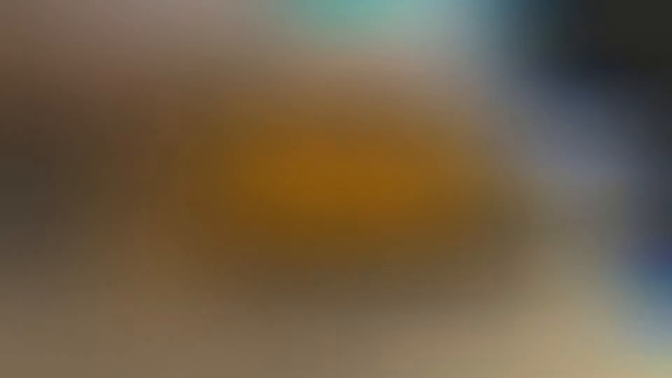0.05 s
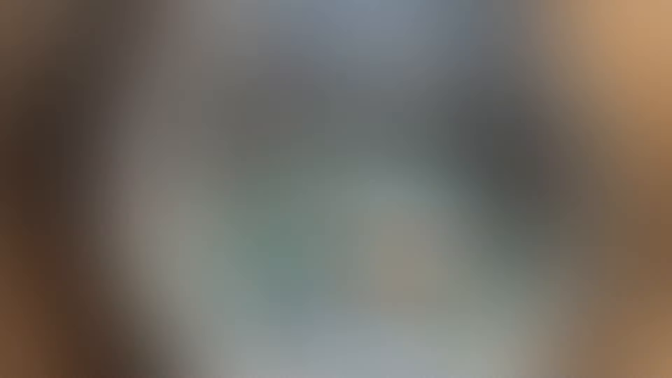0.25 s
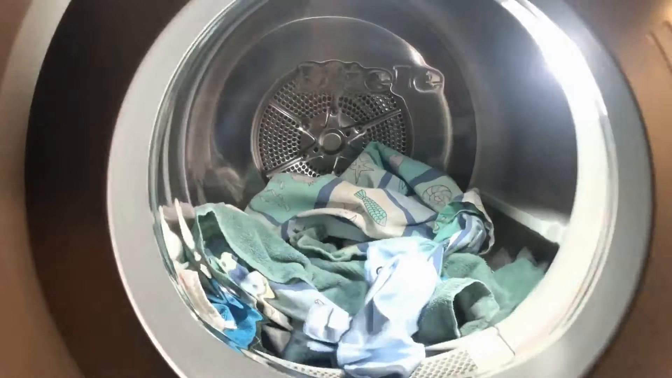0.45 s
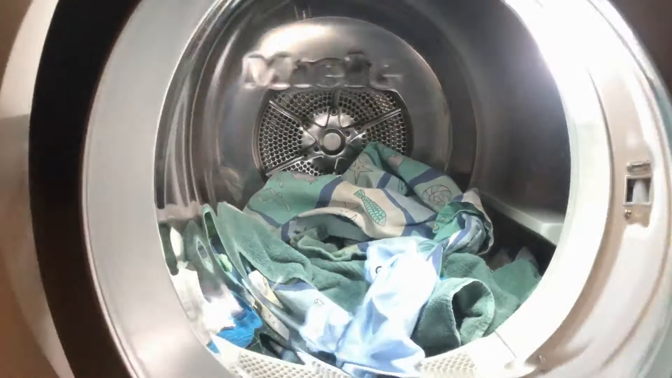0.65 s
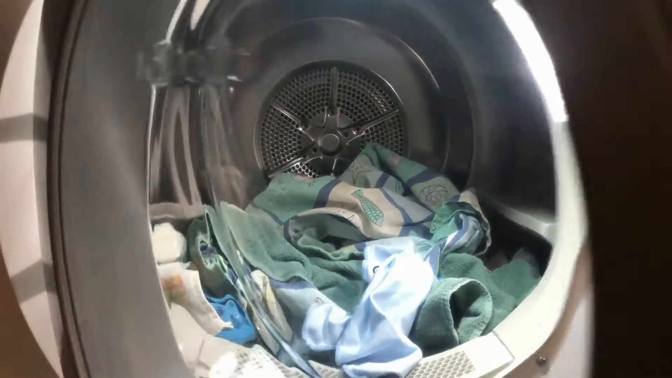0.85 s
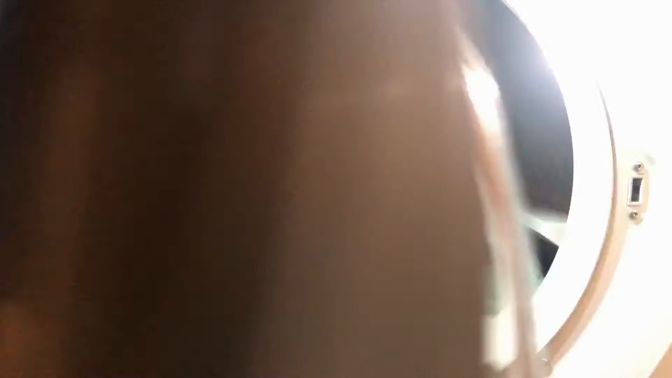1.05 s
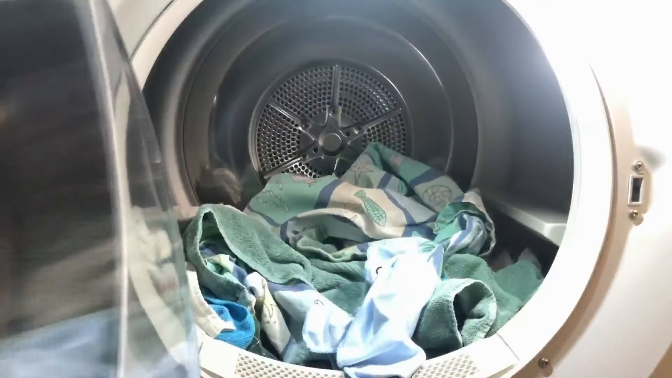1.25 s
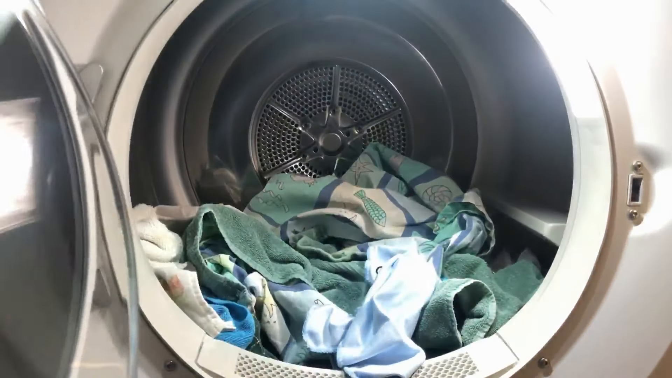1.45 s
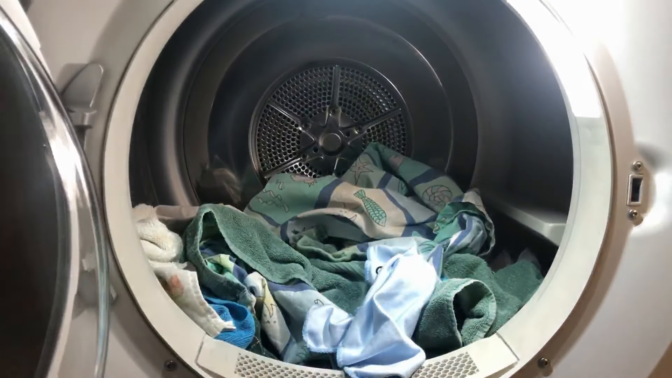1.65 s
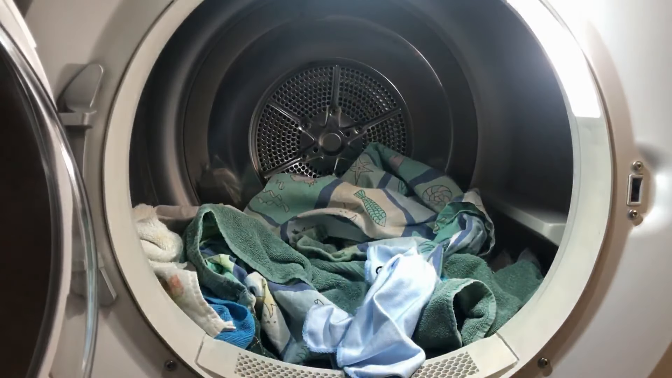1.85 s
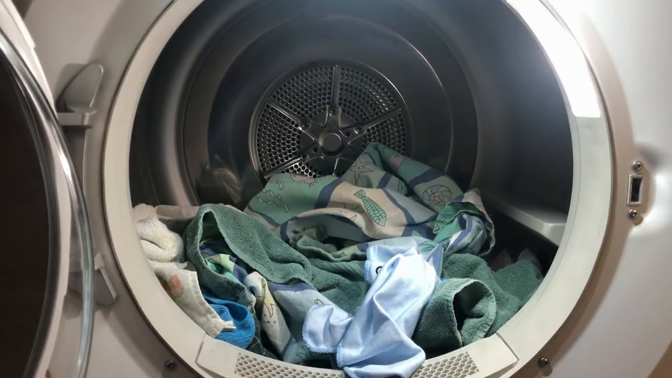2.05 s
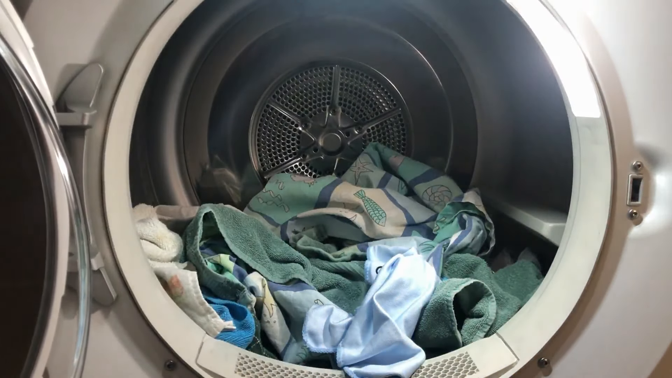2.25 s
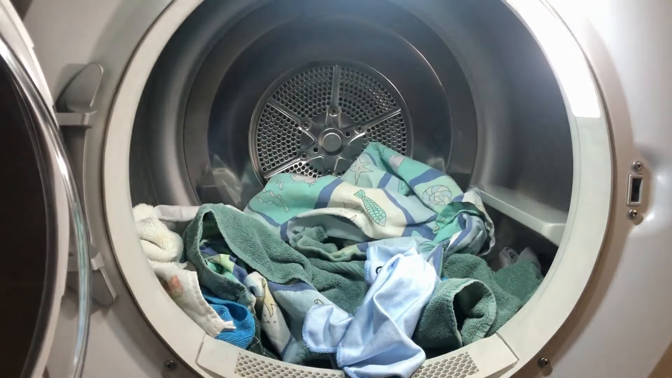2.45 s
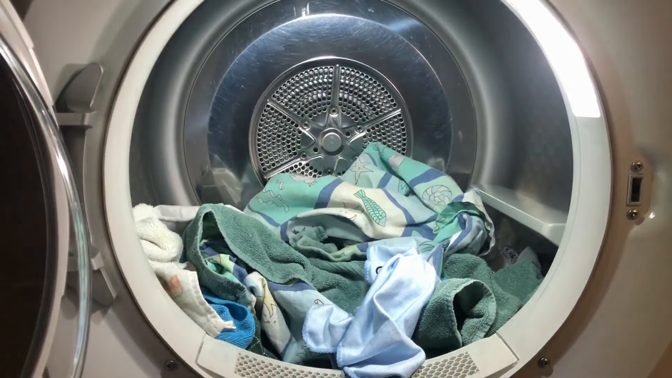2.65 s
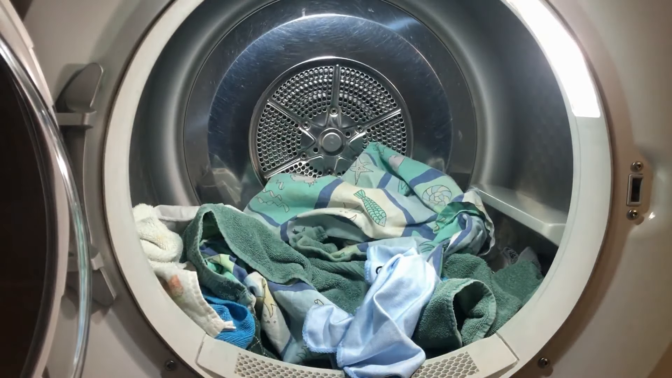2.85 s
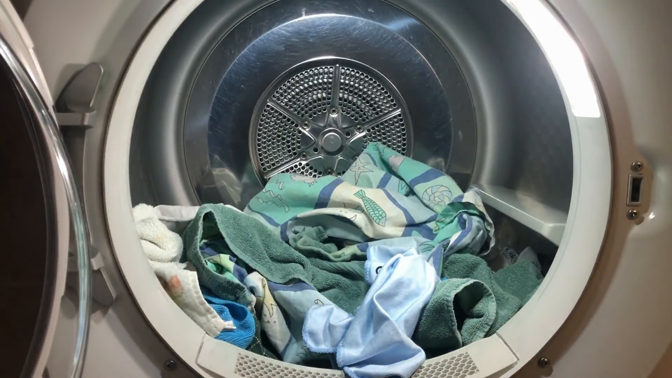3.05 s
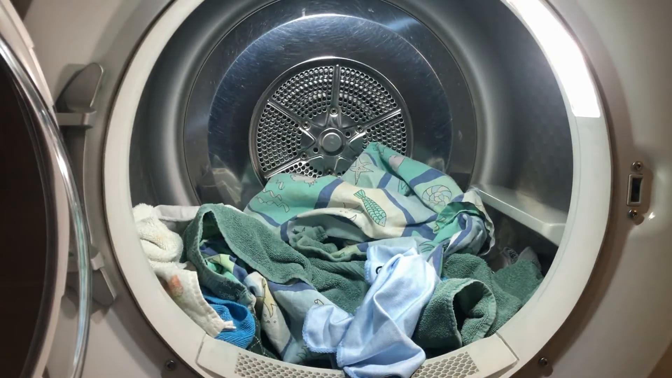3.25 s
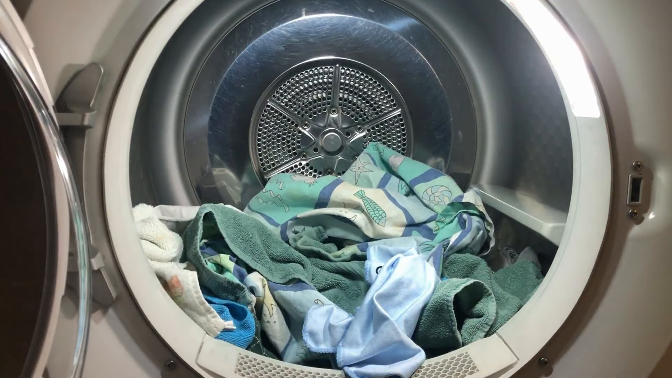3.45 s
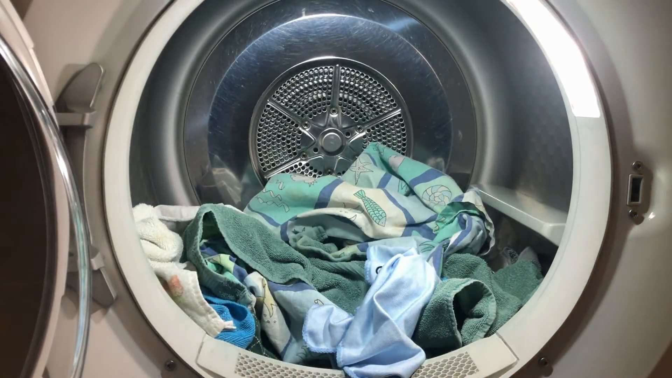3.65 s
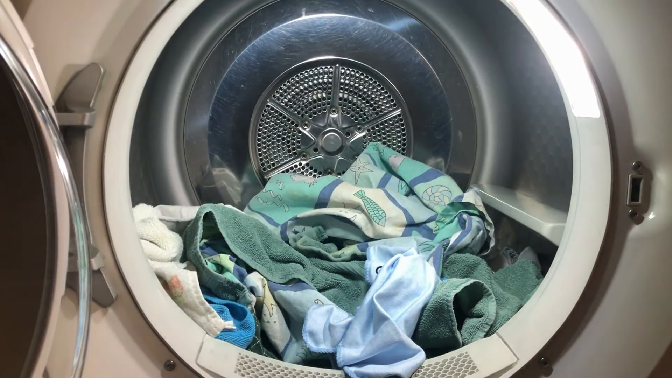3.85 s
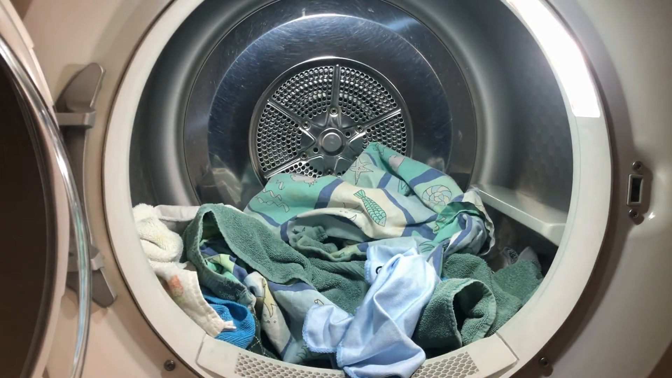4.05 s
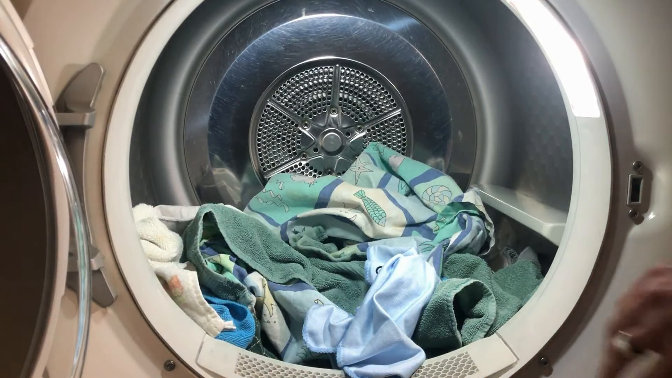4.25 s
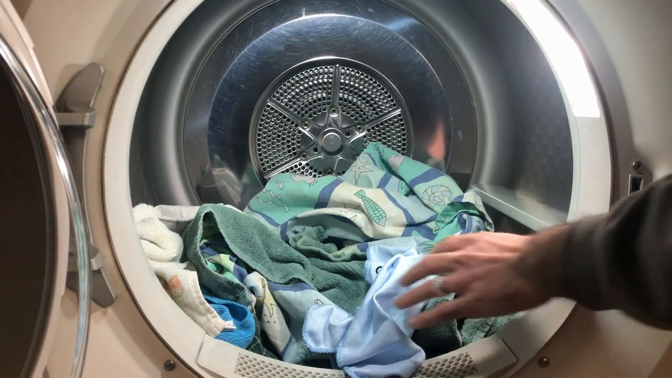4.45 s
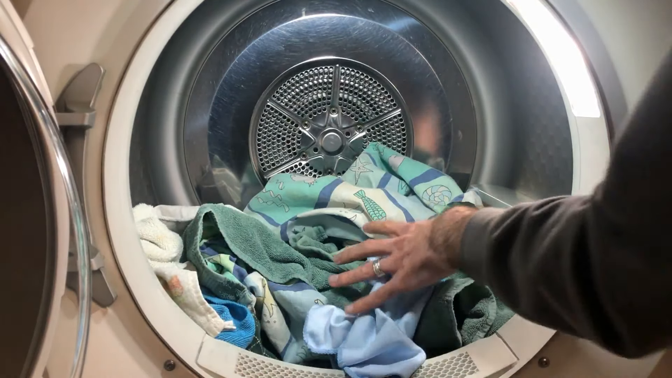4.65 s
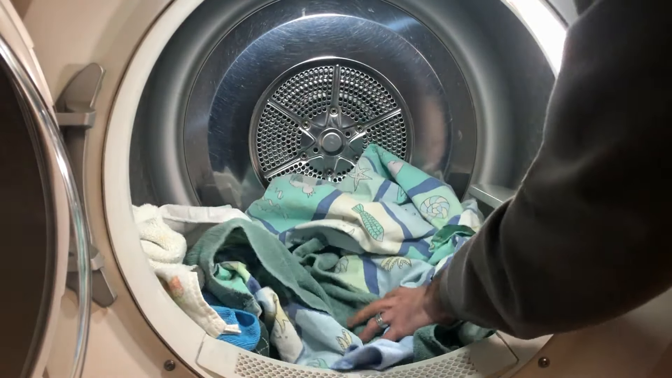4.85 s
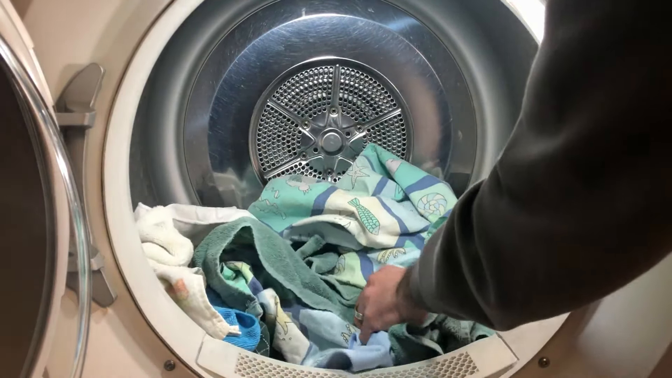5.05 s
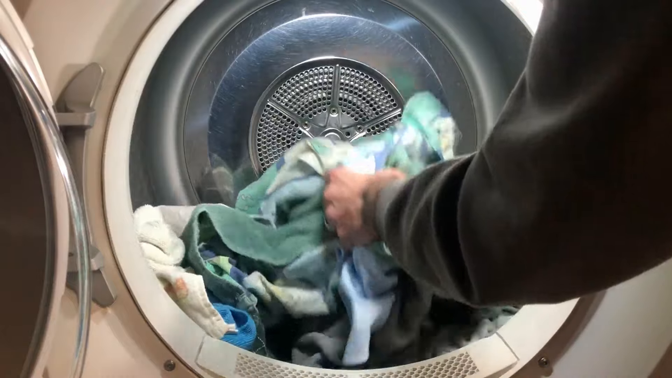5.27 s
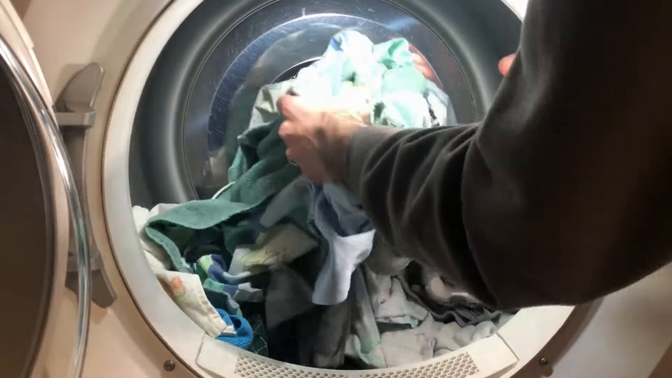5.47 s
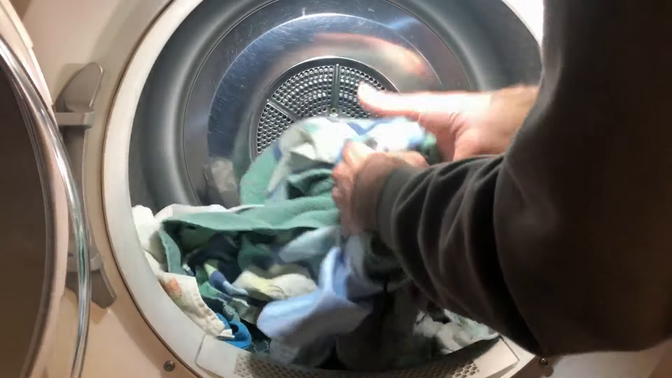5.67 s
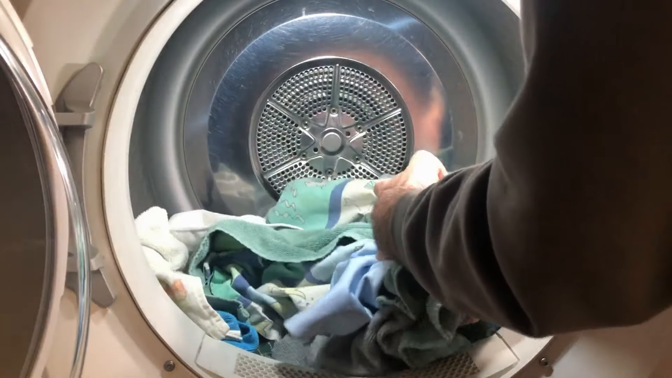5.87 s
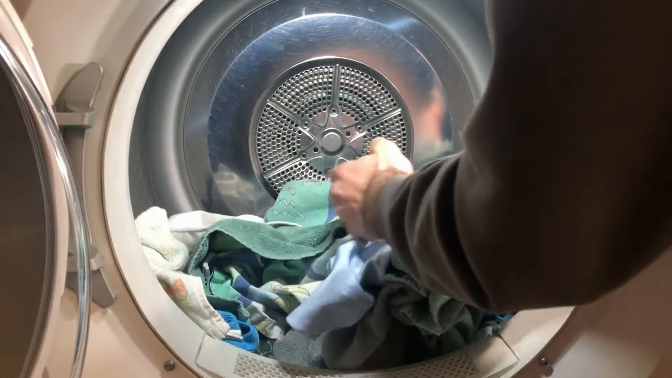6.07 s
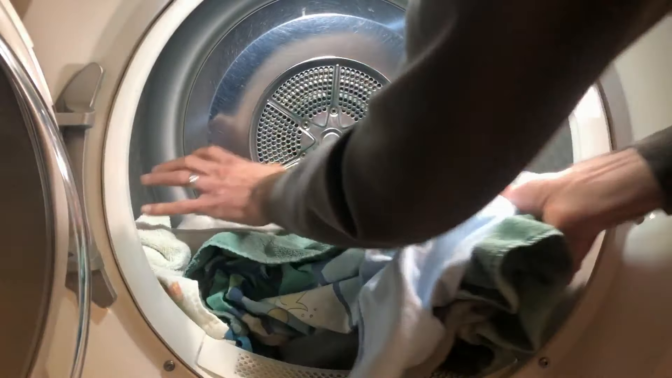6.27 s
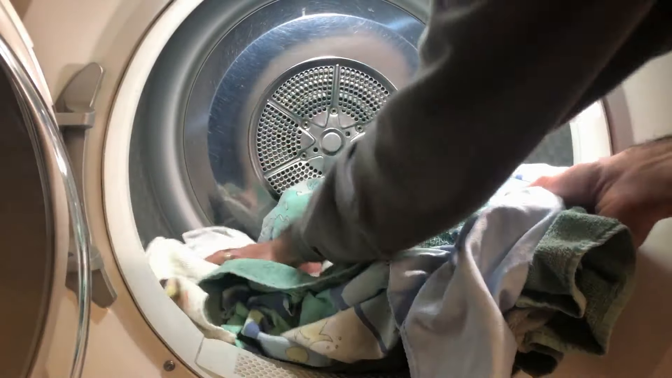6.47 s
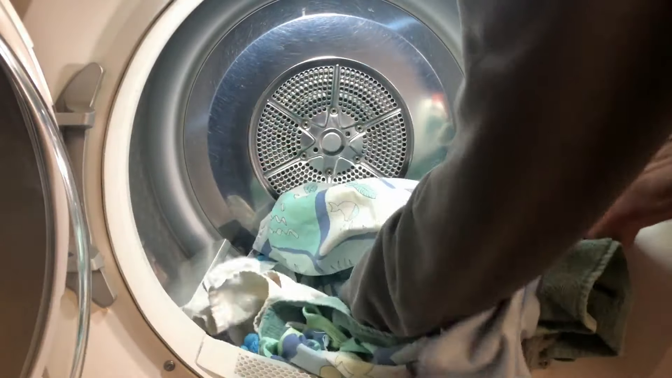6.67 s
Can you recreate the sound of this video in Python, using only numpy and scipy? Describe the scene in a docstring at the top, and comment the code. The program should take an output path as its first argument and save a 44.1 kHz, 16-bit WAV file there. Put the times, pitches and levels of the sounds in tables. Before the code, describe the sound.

Close to a tumble dryer in a quiet room, faint rubbing and ticking lead into a loud latch crack that rings the front panel and steel drum. The door swings open with a soft push of air, bumps its hinge stop and shudders. Sleeves swish, a knock makes the metal cabinet boom, and hands gather laundry with soft rustling and a few light bumps on the rim and drum.

```python
"""A soft rubbing and ticking rises over quiet room noise as a tumble dryer's door is tugged; then the latch
cracks open, and the front panel and steel drum ring. The door swings past, pushing air, bounces on its
hinge stop and shudders. Sleeves swish, a knock sets the sheet-metal cabinet booming, and hands gather
the laundry, bumping the rim. Impacts excite damped modes and dense bands of decaying noise;
rubbing is stick-slip friction, a stream of tiny random impulses."""
import sys
import numpy as np
from scipy import signal
from scipy.fft import rfft, irfft, next_fast_len
from scipy.io import wavfile
from scipy.ndimage import uniform_filter1d

SR = 44100
rng = np.random.default_rng(int(sys.argv[2]) if len(sys.argv) > 2 else 0)


def output_pcm(signal):
    """Save a mono or channel-first signal as 16-bit PCM at the path in sys.argv[1].

    Samples are clipped to [-1, 1] before scaling.
    """
    pcm = np.clip(np.atleast_2d(signal).T, -1, 1) * 32767
    wavfile.write(sys.argv[1], SR, np.round(pcm).astype(np.int16))


N = 295911
T = np.arange(N) / SR
AGE = T[:int(1.2 * SR)]   # seconds since an impact

# Spectra of the room noise and of each kind of friction: frequency_hz, relative_density_db
ROOM_SPECTRUM = [(30, -13), (50, -0.5), (90, -6), (200, -10.5), (320, -10.5), (600, -16.5), (1200, -19.5),
                 (2060, -27.5), (3170, -24.5), (4400, -29), (6400, -30), (15500, -33.5)]
SLEEVE_SPECTRUM = [(290, -43.5), (500, -32), (611, -7.5), (1120, 0), (1900, -8), (2760, -5.5), (3010, -0.5),
                   (4190, -11), (5050, -3.5), (6180, -15.5), (7240, -8.5), (12100, -16), (15500, -12)]
LAUNDRY_RUB_SPECTRUM = [(100, -6.5), (250, -2.5), (600, -7), (1200, -7), (2000, -18.5), (3000, -17)]
FIBRE_HISS_SPECTRUM = [(1060, -21.5), (1800, -1.5), (2060, -4), (3410, 0), (4240, -6.5), (5400, -4),
                       (9360, -10.5), (10400, -11.5), (15500, -10.5)]
SCRAPE_SPECTRUM = [(2300, -4.5), (3100, 2), (3800, -6), (5200, 0), (6200, -15), (7600, -6.5), (10000, -9),
                   (15500, -9.5)]
DOOR_RUB_SPECTRUM = [(250, -6.5), (600, 0.5), (1150, 0.5), (1700, -8), (3000, -15.5), (6000, -30),
                     (15000, -39)]
# A thin steady whine inside a narrow hiss: centre_hz, width_hz, level_db
WHINE_BANDS = [(5625, 55, -86), (5680, 330, -85.5)]
# Clothing stirs more as someone comes near: time_s, level_db
STIRRING_CURVE = [(0, -94), (1.0, -85), (2.45, -93.5), (3.1, -71.5), (4.4, -74), (6.7, -75)]
# Single pulls at the laundry: start_s, length_s, rub_db, hiss_db
LAUNDRY_PULLS = [(4.52, 0.24, -72, -64.5), (4.7, 0.31, -62.5, -67), (5.105, 0.55, -61, -67),
                 (5.6, 0.45, -71, -66), (6.015, 0.15, -83, -64), (6.213, 0.45, -63, -65),
                 (6.492, 0.19, -56, -66.5), (6.58, 0.21, -57.5, -64.5)]
# Strokes of sleeves, of something hard on metal, and of seal and hinge: start_s, length_s, level_db
SLEEVE_STROKES = [(1.07, 0.25, -68), (3.234, 0.18, -52.5), (3.538, 0.29, -63.5), (3.734, .17, -53)]
METAL_SCRAPES = [(4.44, 0.033, -54.5), (4.494, 0.058, -45.5)]
DOOR_RUBS = [(-.01, 0.088, -68.5), (.132, 0.1, -69), (0.226, 0.12, -53), (0.323, 0.064, -57),
             (0.984, 0.26, -71), (1.714, 0.18, -73), (2.723, 0.17, -62.5), (3.59, 0.61, -66)]
# Air pushed by the swinging door: centre_s, peak_db, frequency_hz
AIR_PUFFS = [(1.201, -49.5, 59.2), (1.222, -50, 75), (1.245, -54.5, 99.1), (1.291, -48, 43.2),
             (1.346, -56, 55), (1.449, -46.5, 53.1)]
# Dry clacks of hard plastic close by: start_s, level_db, pitch_hz, t60_s
PLASTIC_CLACKS = [(0.212, -51.5, 1360, 0.016), (0.3695, -7, 1333, 0.0071), (0.9305, -40, 1000, 0.02),
                  (0.9541, -35, 1107, 0.008), (0.96, -43, 1140, 0.0088), (4.012, -47.5, 660, .018),
                  (4.3609, -24.5, 1147, 0.078), (4.543, -39.5, 1340, 0.038), (5.657, -28.5, 1270, 0.01)]
# Impacts on each part (ticks are small plastic and metal contacts):
# start_s, level_db, extra_bass_db, extra_treble_db
TICK_IMPACTS = [(.213, -74, 0.5, 1), (.279, -66, 0, 1), (.335, -66, 3, 1), (.347, -74, 5.5, -10),
                (1.608, -65, -10, 6), (1.838, -69.5, -3.5, 3.5), (2.2594, -50, 13, 4.5),
                (4.3592, -56, 4, -13), (5.478, -60.5, 9, -13)]
RIM_IMPACTS = [(.232, -56, -5, 1.5), (.932, -55, -19, 3), (1.609, -71.5, 1, -2), (1.862, -65, 2.5, 6.5),
               (4.011, -65, 1, -19), (5.6575, -44.5, 7, 3), (5.757, -62, 15, -8), (5.776, -59, 15, -27),
               (5.825, -65.5, 7, -12), (6.357, -60.5, 6.5, -12)]
DRUM_IMPACTS = [(6.418, -60.5, 10, -11), (6.466, -49.5, 5.5, -8), (6.517, -45, 7, -9), (6.532, -43.5, 1, 0)]
CABINET_IMPACTS = [(3.593, -61.5, 3.5, 2.5), (4.359, -30.5, -2, 2), (4.385, -37.5, 10.5, -22),
                   (4.543, -54, 4.5, 0.5), (4.755, -59, 6, -6)]
LATCH_IMPACTS = [(0.212, -65, 2, -8.5), (0.28, -64, 3.5, 3.5), (0.333, -56.5, -5, -1),
                 (.348, -63.5, -5, -3), (0.3694, -20.5, 1.5, 2)]
# Dense ring of each part and the room around it: frequency_hz, relative_density_db, t60_s
TICK_DECAY = [(200, -29, .1), (1510, -46.5, .2), (2850, 4.5, 0.33), (3700, -8, 0.16), (5100, 8, 0.35),
              (6500, -5, .18), (7950, 4, 0.23), (11500, 1.5, .17), (14500, 9, 0.13)]
RIM_DECAY = [(70, -33.5, 0.72), (254, -6.5, 0.31), (544, -0.5, 0.24), (1140, -10.5, 0.44),
             (1600, -8.5, 0.15), (2771, -33, 0.09), (6000, -39.5, .12), (15000, -41.5, .1)]
PADDED_DRUM_DECAY = [(45, -18, .4), (79, -1, 0.91), (125, -2.5, 0.64), (185, 2, 0.84), (272, -5, 0.6),
                     (425, -10, 0.26), (620, -9, 0.37), (900, -13.5, 0.34), (1400, -18, .2),
                     (2480, -33, 0.13), (8000, -45, .15)]
STEEL_DRUM_DECAY = [(99.95, -6.5, 1.5), (300, -8.5, 1.9), (600, -9.5, 1.1), (850.4, -3.5, 1.6),
                    (1200, 0.5, 1.1), (1700, -14, 1), (3000, -12.5, 0.7), (5000, -14, .5), (8000, -30, .45),
                    (15000, -41.5, .4)]
CABINET_DECAY = [(44.4, -17, .5), (88.5, 0, 0.88), (160, 1, 0.84), (285, 5, 0.35), (570, -5.5, 0.47),
                 (1200, -1, 0.43), (1800, -12.5, 0.23), (3140, -20, 0.23), (5260, -23, 0.19),
                 (7950, -39, 0.45), (15000, -43, 0.29)]
DOOR_DECAY = [(49.6, -11, 0.22), (80, 5.5, 0.7), (138, -3, 0.55), (251, -5, 0.43), (407, -2.5, 0.32),
              (715, -10, 0.32), (1080, -26.5, 0.4), (2920, -37, 0.2), (14900, -50, 0.18)]
LATCH_DECAY = [(50, -11.5, .9), (89.5, -10.5, 0.94), (158, -20, 0.8), (280, -17.5, .4), (440, -4, 0.31),
               (623, -6, 0.26), (775, -6.5, .34), (1240, 1.5, 0.31), (1691, -9.5, .3), (3200, -8.5, .27),
               (4940, -11.5, 0.26), (6900, -18.5, .21), (10400, -23.5, 0.17), (15000, -24, 0.13)]
# Strongest modes of each part: pitch_hz, relative_level_db, t60_s
TICK_RESONANCES = [(2930, 0, .13), (3050, -4, .1), (5150, -8, .12), (11340, -10, .14), (13170, -8, .13),
                   (13500, -10, .16)]
CABINET_RESONANCES = [(90.4, -9.5, 0.96), (108, -24, 0.77), (190, -7, 0.97), (283, -2, 0.15),
                      (344, 1, 0.11), (435, -21, 0.84), (596, -4, 0.12), (780, -3.5, 0.25), (856, 6, 0.071),
                      (926, -42, 0.27), (1130, -5.5, 0.15), (1244, 11, 0.041), (1350, -21, 0.53)]
DOOR_RESONANCES = [(154, -20, 0.4), (187.6, -9, 0.64), (249.7, -1.5, 0.43), (353.7, -2, 0.13),
                   (389, 1.5, 0.12), (465, -12.5, 0.11), (582, -19, 0.35), (693, -12, 0.23)]
# Strongest modes of the latch and front panel: pitch_hz, relative_level_db
LATCH_RESONANCES = [(86, -11.5), (808, 0.5), (881, -4.5), (1055, -6.5), (1109, -9.5), (1179, -7),
                    (1204, -1), (1357, -6.5), (1387, -4.5), (1705, -8), (1884, -14.5), (1975, -10.5),
                    (2297, -8), (2424, -6), (2568, -9), (2924, -10), (3149, -11.5), (3289, -7), (3438, -10),
                    (3801, -9.5), (4048, -11), (4759, -15), (4931, -13), (5222, -13)]

RELEASE_S, STOP_S = LATCH_IMPACTS[-1][0], 2.2525   # the latch lets go; the door meets its stop


def from_db(db):
    """Amplitude grows tenfold with every 20 dB."""
    return 10 ** (np.asarray(db) / 20)


def rms_one(x):
    """Normalisation to unit power."""
    return x / np.sqrt(np.mean(x ** 2) + 1e-20)


def at_hz(rows, hz):
    """Interpolation of a spectrum's columns on a logarithmic frequency axis."""
    frequencies, *columns = np.transpose(rows)
    return [np.interp(np.log(hz), np.log(frequencies), column) for column in columns]


def butter(x, hz, kind, order=2):
    """Causal Butterworth filtering, maximally flat in the passband."""
    sections = signal.butter(order, np.clip(hz, 10, .48 * SR), kind, fs=SR, output="sos")
    return signal.sosfilt(sections, x + 1e-18)


def add(out, start_s, sound):
    """Superposition: a sound adds to what is already there."""
    start = max(0, round(start_s * SR))
    out[start:start + len(sound)] += sound[:max(0, N - start)]


def drift(rate_hz):
    """Slow random modulation of unit power."""
    knots = rng.standard_normal(4096)
    return rms_one(np.interp(T * rate_hz, np.arange(len(knots)), knots))


def swell(start_s, length_s, skew=1):
    """The envelope of one stroke; a skew under 1 brings its peak forward."""
    return np.sin(np.pi * np.clip((T - start_s) / length_s, 0, 1) ** skew) ** 2


def pressure_pulse(centre_s, db, hz):
    """A bipolar pulse: compression, then rarefaction."""
    phase = np.clip(2 * np.pi * hz * (T - centre_s), -10, 10)
    return -from_db(db) * phase * np.exp((1 - phase ** 2) / 2)


def coloured(x, spectrum):
    """Spectral shaping that rolls off beyond the table's ends; unit power."""
    size = next_fast_len(N)
    hz = np.maximum(np.arange(size // 2 + 1) * SR / size, 1)
    skirts = np.minimum(hz / spectrum[0][0], 1) ** 4 * np.minimum(spectrum[-1][0] / hz, 1) ** 2
    gain = from_db(at_hz(spectrum, hz)[0]) * skirts
    return rms_one(irfft(rfft(x, size) * gain, size)[:N])


def friction(spectrum, slips_per_s, grain_db, clump_db):
    """Stick-slip friction: countless tiny impulses of uneven size, coming in clumps."""
    sizes = from_db(grain_db * np.minimum(rng.exponential(1, N), 4)) * rng.choice([-1, 1], N)
    slips = sizes * (rng.random(N) < slips_per_s / SR)
    return coloured(slips * from_db(clump_db * drift(rate_hz=45)), spectrum)


def reflected(x, echo_db, count=14):
    """Comb filtering: early echoes off drum and walls interfere with the direct sound; unit power."""
    out = x.copy()
    for delay_s, strength in zip(rng.uniform(.002, .03, count), rng.standard_normal(count)):
        add(out, delay_s, from_db(echo_db) * strength * x)
    return rms_one(out)


def noise_bands(size):
    """Third-octave division of white noise; yields centre_hz, samples."""
    edges_hz = 25 * 2 ** (np.arange(30) / 3)
    white = rng.standard_normal((2, size + SR // 4))
    for k, (low, high) in enumerate(zip(edges_hz, edges_hz[1:])):
        yield np.sqrt(low * high), butter(white[k % 2], [low, high], "band")[-size:]


def decay(t60_s):
    """Exponential damping: 60 dB are lost in t60_s."""
    return np.exp(-np.log(1000) * AGE / t60_s)


def build_up(hz, cycles):
    """A resonance needs some cycles to reach full swing, so lows arrive after highs."""
    return (1 - np.exp(-AGE * hz / cycles)) ** 2


def dense_ring(bands, direct_db, direct_s, build_cycles):
    """Modal overlap: crowded modes and room echoes merge into noise that dies band by band."""
    tail, power = 0, 0
    for hz, noise in noise_bands(len(AGE)):
        density_db, t60_s = at_hz(bands, hz)
        steady = noise / np.sqrt(uniform_filter1d(noise ** 2, size=1800) + 1e-20)
        gain = from_db(density_db) * np.sqrt(hz)   # higher bands are wider
        tail = tail + gain * steady * build_up(hz, build_cycles) * decay(t60_s)
        power += gain ** 2
    onset_boost = 1 + from_db(direct_db) * np.exp(-AGE / direct_s)
    return tail / np.sqrt(power) * onset_boost


def modal_ring(modes, build_cycles):
    """Free vibration: each mode is a damped sine of random phase."""
    out = 0
    for hz, db, t60_s in modes:
        sine = np.sin(2 * np.pi * (hz * AGE + rng.random()))
        out = out + from_db(db) * sine * decay(t60_s) * build_up(hz, build_cycles)
    return out


def strike(impacts, response, bass_hz, treble_hz):
    """Impulse excitation: each blow rings the part afresh; soft ones favour bass, hard ones treble."""
    out = np.zeros(N)
    for start_s, db, bass_db, treble_db in impacts:
        ring = response()
        ring = ring + (from_db(bass_db) - 1) * butter(ring, bass_hz, "low", order=1)
        ring = ring + (from_db(treble_db) - 1) * butter(ring, treble_hz, "high", order=1)
        add(out, start_s, from_db(db) * ring)
    return out


def room_tone():
    """Broadband noise comes up as rumble and hiss; narrowband noise is heard as a thin whine."""
    whine = 0
    for hz, width_hz, db in WHINE_BANDS:
        band = butter(rng.standard_normal(N), [hz - width_hz / 2, hz + width_hz / 2], "band")
        whine = whine + from_db(db) * rms_one(band)
    steady_db, rise_db, rise_s = -67, 5.5, 0.42
    level_db = steady_db - rise_db * np.maximum(1 - T / rise_s, 0)
    return from_db(level_db) * coloured(rng.standard_normal(N), ROOM_SPECTRUM) + whine


def sleeves():
    """Sliding friction of clothing swishes in single strokes."""
    strokes = sum(from_db(db) * swell(start_s, length_s) for start_s, length_s, db in SLEEVE_STROKES)
    swish = friction(SLEEVE_SPECTRUM, slips_per_s=9900, grain_db=3.0, clump_db=2.0)
    return strokes * reflected(swish, echo_db=-19.0)


def laundry():
    """Incoherent sources add in power: steady handling, single pulls and the hiss of stirring clothes."""
    hands_in_s, rise_s = 4.5, .1
    hands = np.clip((T - hands_in_s) / rise_s, 0, 1)
    stirring = from_db(np.interp(T, *np.transpose(STIRRING_CURVE)))
    rub_gain = from_db(-64.5) * hands
    hiss_gain = np.hypot(from_db(-70.5) * hands, stirring)
    for start_s, length_s, rub_db, hiss_db in LAUNDRY_PULLS:
        pull = swell(start_s, length_s, skew=0.68)
        rub_gain = np.hypot(rub_gain, from_db(rub_db) * pull)
        hiss_gain = np.hypot(hiss_gain, from_db(hiss_db) * pull)
    rub = friction(LAUNDRY_RUB_SPECTRUM, slips_per_s=3400, grain_db=2.0, clump_db=2.5)
    rub = reflected(rub, echo_db=-17.5)
    hiss = friction(FIBRE_HISS_SPECTRUM, slips_per_s=12000, grain_db=4.5, clump_db=0.3)
    hiss = reflected(hiss, echo_db=-19.5)
    return rub_gain * rub + hiss_gain * hiss


def drum_bumps():
    """Padded impacts on the loaded drum excite mostly its low resonances."""
    def response():
        return dense_ring(PADDED_DRUM_DECAY, direct_db=9, direct_s=0.0059, build_cycles=0.79)
    return strike(DRUM_IMPACTS, response, bass_hz=300, treble_hz=890)


def scrapes():
    """Friction of something hard on metal starts abruptly and fades."""
    strokes = sum(from_db(db) * (T > start_s) * np.exp(-((T - start_s) / length_s) ** 2)
                  for start_s, length_s, db in METAL_SCRAPES)
    scrape = friction(SCRAPE_SPECTRUM, slips_per_s=4500, grain_db=2.0, clump_db=1.5)
    return strokes * reflected(scrape, echo_db=-17)


def taps():
    """Brief contacts excite quickly damped vibration: plastic rim knocks, bright ticks and dry clacks."""
    def rim():
        return dense_ring(RIM_DECAY, direct_db=2.0, direct_s=0.0036, build_cycles=0.96)

    def tick():
        ring = dense_ring(TICK_DECAY, direct_db=13.0, direct_s=0.0014, build_cycles=1.1)
        return ring + from_db(-12) * modal_ring(TICK_RESONANCES, build_cycles=1.1)
    out = strike(RIM_IMPACTS, rim, bass_hz=603, treble_hz=1770)
    out += strike(TICK_IMPACTS, tick, bass_hz=2494, treble_hz=6960)
    for start_s, db, hz, t60_s in PLASTIC_CLACKS:
        add(out, start_s, from_db(db) * np.sin(2 * np.pi * hz * AGE) * decay(t60_s))
    return out


def cabinet():
    """Knocks excite the bending modes of the sheet-metal housing, which booms."""
    def response():
        panels = dense_ring(CABINET_DECAY, direct_db=0, direct_s=0.0048, build_cycles=1.2)
        return panels + from_db(-4.5) * modal_ring(CABINET_RESONANCES, build_cycles=0.6)
    return strike(CABINET_IMPACTS, response, bass_hz=347, treble_hz=1100)


def door_swing():
    """Friction at seal and hinge gives rubs and one soft moan; the passing door displaces air."""
    strokes = sum(from_db(db) * swell(start_s, length_s, skew=.6) for start_s, length_s, db in DOOR_RUBS)
    slips = friction(DOOR_RUB_SPECTRUM, slips_per_s=3000, grain_db=1.0, clump_db=3.0)
    rub = strokes * reflected(slips, echo_db=-14.5)
    moan_s, half_width_s, moan_hz = 1.652, .028, 372
    moan = from_db(-65) * np.exp(-((T - moan_s) / half_width_s) ** 2) * np.sin(2 * np.pi * moan_hz * T)
    air = sum(pressure_pulse(centre_s, db, hz) for centre_s, db, hz in AIR_PUFFS)
    return rub + moan + air


def door_shudder():
    """The stopped door lurches, then sways unevenly in its lowest mode until hinge friction damps it."""
    age = T - STOP_S
    fade_db_per_s, attack_s, hold_s, release_s = 9.5, 0.014, .76, .05
    sway_db = -49 - fade_db_per_s * age + 2.5 * drift(rate_hz=7.5)
    gate = np.clip(age / attack_s, 0, 1) * np.exp(-np.maximum(age - hold_s, 0) / release_s)
    sway = from_db(sway_db) * gate
    lurch = from_db(-38.5) * swell(STOP_S + .04, length_s=.11)
    pitch_hz = 65.7 + 2.23 * drift(rate_hz=9)
    return (lurch + sway) * rms_one(np.sin(2 * np.pi * np.cumsum(pitch_hz) / SR))


def hinge_stop():
    """Inelastic collision: the door's dull rebounds come ever sooner and weaken to a faint rocking."""
    def response():
        ring = dense_ring(DOOR_DECAY, direct_db=-21, direct_s=0.0077, build_cycles=2.65)
        return ring + from_db(1.5) * modal_ring(DOOR_RESONANCES, build_cycles=0.78)
    first_gap_s, restitution, bounce_count = .212, .8, 4
    stop_db, loss_db, rocking_db = -34, 12, -60.5
    gaps_s = first_gap_s * restitution ** np.arange(bounce_count)
    impacts = [(STOP_S, stop_db, -6, 2.5)]   # start_s, level_db, extra_bass_db, extra_treble_db
    for k, start_s in enumerate(STOP_S + np.cumsum(gaps_s), 1):
        impacts.append((start_s, max(stop_db - loss_db * k, rocking_db), 5.5, -22))
    return strike(impacts, response, bass_hz=150, treble_hz=890)


def drum_ring():
    """Structural coupling: the jolt of the latch leaves the lightly damped steel drum ringing faintly."""
    out = np.zeros(N)
    ring = dense_ring(STEEL_DRUM_DECAY, direct_db=-20, direct_s=.005, build_cycles=8)
    add(out, RELEASE_S, from_db(-45) * ring)
    return out


def latch():
    """Release of elastic energy: the tugged catch cracks, its spring clicks, door and front panel ring."""
    # the modes share the panel's damping
    modes = [(hz, db, at_hz(LATCH_DECAY, hz)[1]) for hz, db in LATCH_RESONANCES]

    def response():
        panel = dense_ring(LATCH_DECAY, direct_db=1.0, direct_s=0.0042, build_cycles=1.0)
        return panel + from_db(-9) * modal_ring(modes, build_cycles=.9)
    crack = pressure_pulse(RELEASE_S + 0.00019, db=-5.0, hz=2150)
    spring = pressure_pulse(RELEASE_S + .0012, db=-1, hz=11000)
    return strike(LATCH_IMPACTS, response, bass_hz=400, treble_hz=3000) + crack + spring


def scene():
    """Superposition of all sources at one point close to the dryer."""
    door = latch() + drum_ring() + door_swing() + hinge_stop() + door_shudder()
    contacts = cabinet() + drum_bumps() + scrapes() + taps()
    return (door + contacts + sleeves() + laundry() + room_tone())[None]


def record(dry):
    """Band limiting and saturation: deep bass is shed, the hardest peak rounded, the top cut steeply."""
    low_hz, high_hz, ceiling = 32, 16000, .8
    rounded = ceiling * np.tanh(butter(dry, low_hz, "high") / ceiling)
    return signal.sosfilt(signal.ellip(10, .1, 80, high_hz, fs=SR, output="sos"), rounded)


dry = scene()
out = record(dry)
output_pcm(out)
```